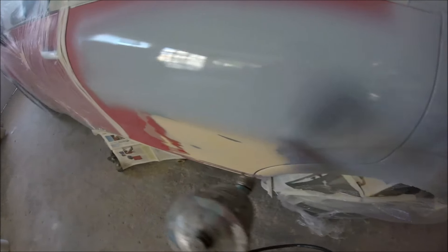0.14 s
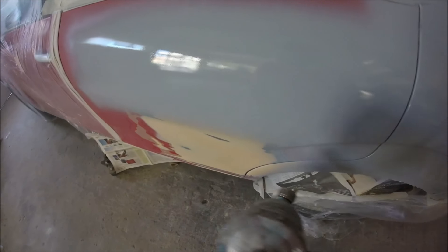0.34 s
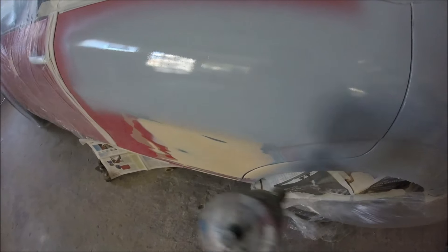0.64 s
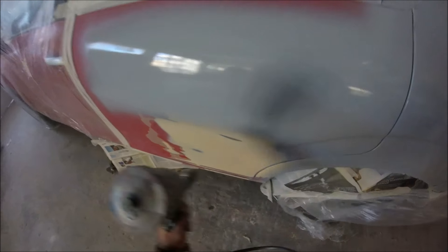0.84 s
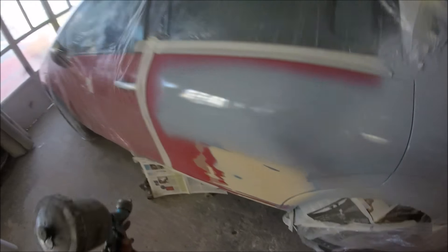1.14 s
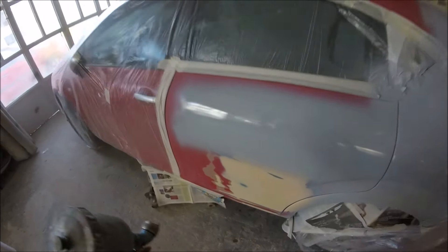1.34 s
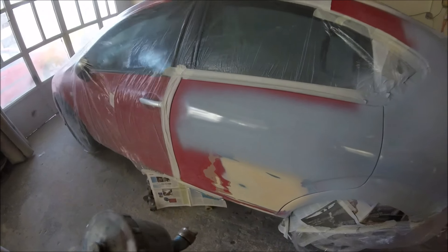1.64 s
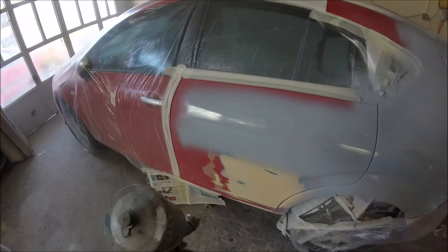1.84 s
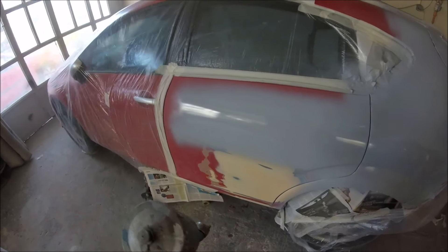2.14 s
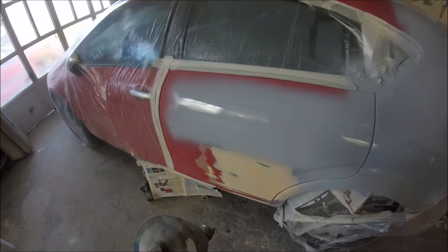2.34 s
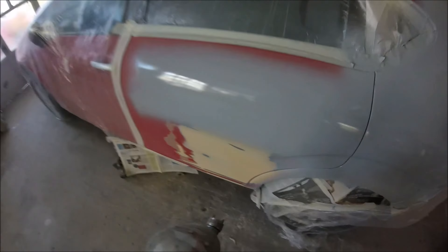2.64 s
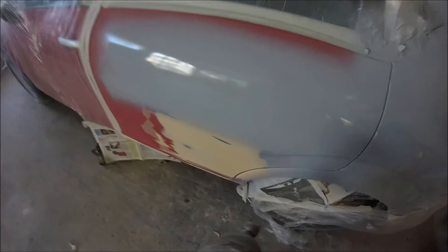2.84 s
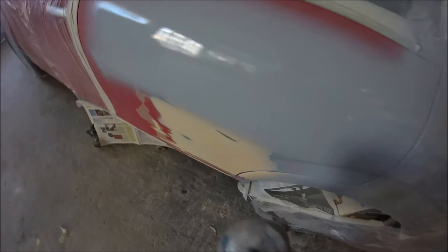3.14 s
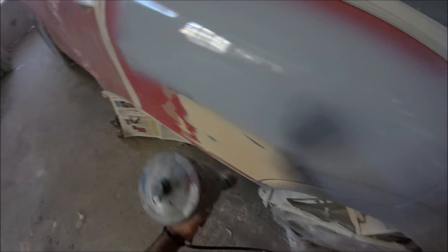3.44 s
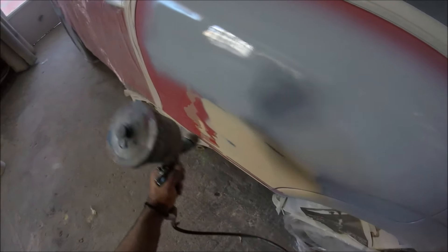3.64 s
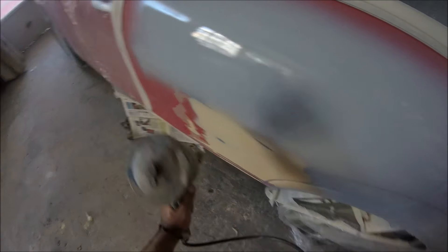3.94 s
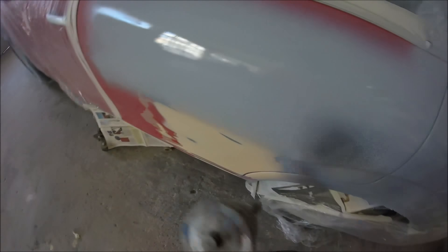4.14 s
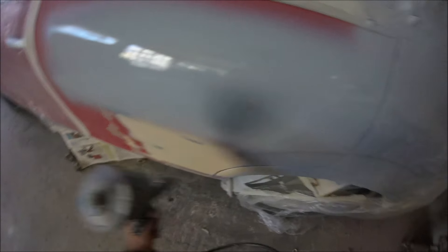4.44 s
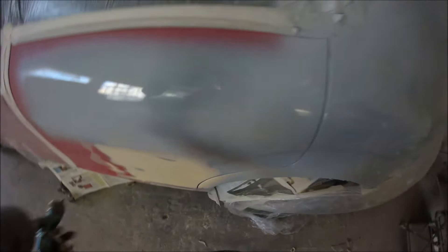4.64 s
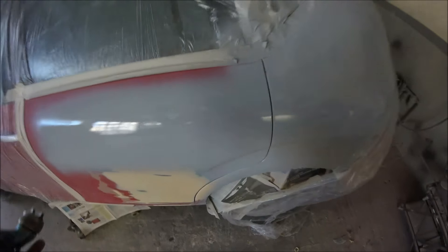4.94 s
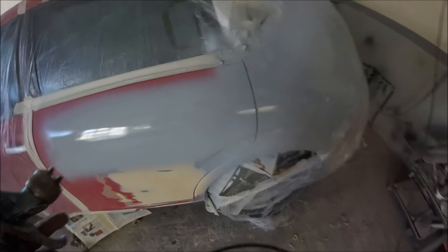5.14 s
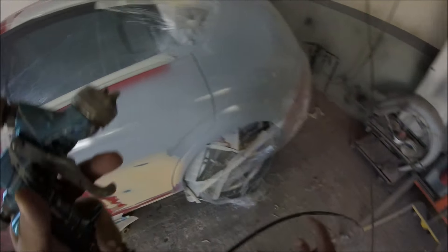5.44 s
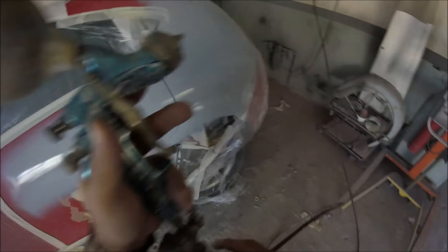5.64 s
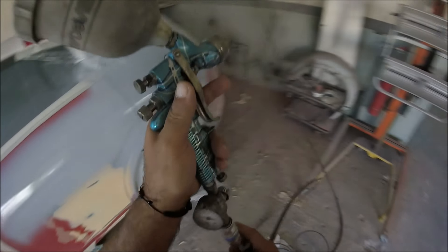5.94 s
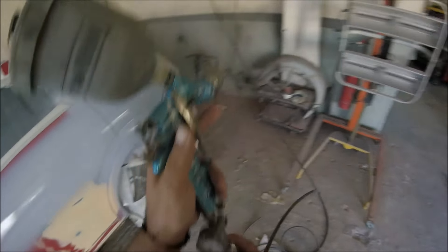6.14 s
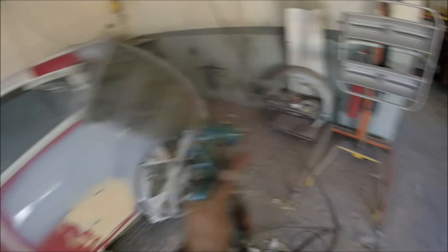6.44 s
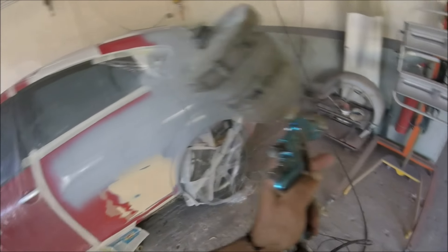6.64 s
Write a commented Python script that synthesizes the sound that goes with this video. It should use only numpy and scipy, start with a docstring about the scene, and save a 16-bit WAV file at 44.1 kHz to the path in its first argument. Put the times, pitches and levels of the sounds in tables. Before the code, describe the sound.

A compressed-air spray gun hisses from start to finish, painting a car panel in a workshop close to the microphone. The hiss is bright and steady, its tone shifting slightly as the gun moves. It stutters very briefly at about 0.3 and 0.4 seconds, then runs evenly until two more tiny stutters at around 5 seconds. At about 5.2 seconds there is one soft, deep thump as the gun swings up towards the microphone. The hiss grows louder and sharper, with a slightly hollow, sweeping colour, peaking near 5.6 seconds. It eases back by 6 seconds and is still going at the end, just short of 7 seconds. Behind it, machines give a faint, dull rumble and a low, wavering hum. Soft puffs of air buffet the microphone now and then, mainly in the first second and at around 3 and 5 seconds.

```python
"""A steady hiss with four tiny stutters: a compressed-air spray gun painting a car panel in a workshop.
The jet is turbulent noise with fixed resonances. Its narrow beams sweep past, and short reflections
off panel, hand and paint cup comb it as the gun moves. Near the end the gun swings close to the
microphone, with one low thump. Air buffets the microphone softly; machines rumble and hum behind."""
import sys
import numpy as np
from scipy.fft import rfft, irfft, next_fast_len
from scipy.io import wavfile
from scipy.ndimage import map_coordinates

SR = 44100
rng = np.random.default_rng(int(sys.argv[2]) if len(sys.argv) > 2 else 0)


def master_out(mix):
    """Clip the mix to full scale and print it as 16-bit PCM to the path in sys.argv[1]."""
    frames = np.transpose(np.atleast_2d(mix))
    ceiling = np.clip(frames, -1, 1)
    pcm = np.round(ceiling * 32767).astype(np.int16)
    wavfile.write(sys.argv[1], SR, pcm)


N = 298998
TIME = np.arange(N) / SR
HZ = np.maximum(np.fft.rfftfreq(next_fast_len(N), 1 / SR), 1)

# peaks in the hiss: (centre [Hz], width [Hz], gain [dB])
HISS_PEAKS = [(1115, 152, 12), (1326, 170, 10), (1670, 323, 8), (2408, 574, 8), (2827, 216, 7.5),
              (3360, 363, 10), (3760, 437, 10.5), (4265, 290, 8), (4593, 210, 5.5), (5830, 250, 1.5),
              (6430, 500, 6.5), (7640, 470, 4.5), (8320, 570, 4.5), (9290, 1000, 3.5), (10680, 430, 5.5),
              (11580, 320, 6), (12110, 360, 4.5), (14300, 740, 4.5)]
# gun lifted from panel towards microphone: (time [s], lift [0-1])
GUN_LIFT = [(4.4, 0.02), (4.8, 0.35), (5.3, 0.73), (5.75, 0.7), (6.2, 0.55), (6.5, 0.7), (6.78, 0.6)]


def spray(sputter_db, sputter_hz, flutter_db, flutter_hz):
    """The jet beams its treble, so each register follows rush, nearness and aim by its own shares."""
    # level curves, used about their means: (time [s], level [dB])
    rush = [(0, -51.9), (0.55, -54), (0.72, -46.5), (1.1, -51), (1.2, -59), (3.13, -59.5), (3.22, -47),
            (3.8, -56.5), (4.65, -50.5), (4.78, -60), (5.0, -59.5), (5.12, -52), (5.68, -54), (5.95, -56),
            (6.78, -55.5)]   # air spreading over the panel
    nearness = [(0, -43), (0.35, -42), (1.15, -43.5), (2.5, -45), (3.55, -42), (4.0, -43.5), (4.65, -42),
                (4.85, -38), (5.2, -34.5), (5.38, -33.5), (5.62, -31), (5.9, -38.5), (6.35, -40.5),
                (6.78, -43)]   # gun to microphone
    aim = [(0, -36), (0.28, -34.5), (0.68, -40), (0.86, -35.5), (1.08, -45), (1.48, -41.5), (1.66, -43.5),
           (2.55, -43), (2.92, -39), (3.22, -40.5), (3.68, -37), (3.8, -42.5), (4.02, -44), (4.17, -36.5),
           (4.33, -43), (4.48, -35.5), (4.65, -47), (4.85, -40.5), (5.0, -41), (5.2, -36.5), (5.42, -38),
           (5.62, -29.5), (5.7, -28.5), (5.88, -37.5), (6.78, -41)]   # treble beamed as the wrist turns
    top_hiss = [(0.0, -45), (0.02, -48.5), (0.98, -50), (1.05, -58), (1.45, -52), (1.74, -56.5),
                (2.83, -57), (2.96, -47), (3.19, -55), (3.51, -49), (4.02, -55), (4.14, -51), (4.57, -53),
                (4.65, -58), (4.85, -50), (5.12, -52), (5.7, -44), (5.97, -55), (6.4, -48), (6.53, -53),
                (6.67, -51), (6.78, -53)]   # above 12 kHz
    # rush, body, edge, hiss, sizzle, top:
    # (mean level [dB], shares [ratio] of rush, nearness, aim, top hiss, stutter depth)
    registers = [(-56.5, 0.9, 0.21, 0, 0, 1.2), (-42, 0.091, 0.21, 0.3, 0.044, 1),
                 (-42.5, 0, 0.96, 0.068, 0.078, 0.95), (-41, 0, 0, 0.99, 0.021, 0.56),
                 (-48.5, 0, 0.56, 0.46, 0.091, 1.1), (-48.5, 0, 0, 0, 1, 1.2)]
    # register boundaries: (frequency [Hz])
    crossovers_hz = [1500, 4000, 7400, 10000, 12400]
    breakup_db = sputter_db * drift(sputter_hz)   # uneven paint break-up shakes the whole jet
    jet = reflections(beams(nozzle()))
    moves_db = np.array(in_time(rush) + in_time(nearness) + in_time(aim) + in_time(top_hiss))
    moves_db -= moves_db.mean(axis=1, keepdims=True)
    bands = np.diff([low_pass(hz, order=24) for hz in crossovers_hz], axis=0, prepend=0, append=1)
    heights = np.linspace(0, 1, len(bands))
    steady, broken = np.zeros((2, N))
    for band, height, (mean_db, *shares, stutter_share) in zip(bands, heights, registers):
        level_db = mean_db + np.dot(shares, moves_db) + breakup_db + flutter_db * drift(flutter_hz)
        register = from_db(level_db) * rms_one(filtered(jet, band))
        steady += register
        broken += register * stutter(stutter_share, height)
    return broken + thin_tones(steady, width_hz=52, gain_db=8.0, top_hz=9800)


def nozzle():
    """Turbulent noise in the gun's resonances; close up, its ring stands out and the hollows deepen."""
    # broad jet spectrum: (frequency [Hz], relative level [dB])
    jet_spectrum = [(300, -31), (900, -17), (1020, -18.5), (1100, -10.5), (2000, -10.5), (3000, -9),
                    (5000, -14.5), (7000, -6.5), (9500, -2.5), (9950, -10), (13000, -9), (15000, -7)]
    # colour at full lift: (centre [Hz], width [Hz], gain [dB])
    close_ring = [(1670, 120, 0), (1980, 350, -3), (2760, 200, 4.5), (3800, 200, 5), (4850, 180, -0.5),
                  (5700, 220, -2), (11230, 350, -4), (11800, 320, 2.5), (14300, 800, 0)]
    lift, = in_time(GUN_LIFT)
    far = noise(from_db(over_hz(jet_spectrum) + bells(HISS_PEAKS)))
    close = filtered(far, from_db(bells(close_ring)))
    return far + lift * (close - far)


def beams(jet):
    """As the wrist turns, each passing beam (+) or gap (-) briefly lifts or hollows one band."""
    # passes over the microphone: (time [s], half width [s], centre [Hz], width [Hz], gain [dB])
    passes = [(.03, .17, 7300, 250, -8), (.15, 0.13, 10400, 1200, -7), (.42, 0.12, 3450, 280, 4.5),
              (.8, .2, 3400, 400, -1), (.47, .13, 4940, 400, -6), (.54, 0.18, 8260, 400, -8),
              (1.25, .22, 4350, 700, 4.5), (2.73, 0.29, 5540, 1200, 2), (3.13, 0.26, 8300, 700, -5),
              (4.33, 0.17, 3400, 400, 2), (4.74, 0.14, 10460, 1200, 5.5), (4.86, .09, 12900, 900, 6),
              (5.28, .1, 6000, 300, 4), (5.47, 0.12, 11400, 300, -5), (5.95, .3, 7150, 250, 3.5),
              (6.1, .16, 10550, 350, -5), (6.25, 0.43, 2770, 150, 2), (6.7, .13, 8320, 300, -8),
              (5.33, .12, 10900, 350, 5), (5.46, 0.18, 5500, 900, -2.5), (5.58, .1, 10100, 450, 6.5),
              (5.63, .11, 7600, 700, -5), (5.78, 0.063, 8300, 500, 2.5), (6.08, 0.26, 8880, 330, -7),
              (6.38, .11, 7760, 500, 4.5), (5.58, .08, 12200, 400, 4), (5.62, .09, 9130, 400, 3),
              (6.22, .13, 9350, 350, 3), (6.33, .1, 10800, 400, 6), (6.36, .07, 8550, 550, -5),
              (6.02, .14, 8400, 300, 2.5), (5.88, .06, 6060, 300, 4)]
    return jet + sum(swell(at_s, half_s) * filtered(jet, from_db(bells([band])) - 1)
                     for at_s, half_s, *band in passes)


def reflections(jet, sway_ms=0.13, sway_hz=0.23):
    """Near surfaces comb the jet in passing; far ones add a fine sliding ripple."""
    # panel, hand, cup in line with the jet: (time [s], half width [s], delay [ms], signed gain [ratio])
    glints = [(.39, 0.28, 0.53, -.12), (.57, 0.15, 0.72, -0.15), (1.3, 0.13, 0.55, 0.086),
              (1.62, .4, 0.56, -0.089), (3.87, 0.2, 0.36, 0.16), (4.98, 0.16, 0.696, 0.14),
              (4.98, 0.28, 0.237, 0.12), (5.19, 0.12, 0.73, -0.15), (5.38, 0.097, 0.47, 0.1),
              (5.58, 0.12, 0.81, .22), (5.73, 0.089, 0.27, -0.13), (5.88, 0.088, 0.73, 0.19),
              (5.91, 0.33, 0.95, 0.17), (6.42, .26, 0.832, -.1), (6.72, 0.17, 0.78, -0.2),
              (4.92, 0.091, .86, -.11), (5.03, .06, .355, -.12), (5.53, 0.11, 1.02, -0.12),
              (5.55, .12, 1.1, .13), (5.72, 0.076, .595, 0.037), (5.85, .15, 0.81, -0.1),
              (6.1, .15, .61, 0.06), (6.32, .07, 0.8, 0.12), (6.37, .08, 0.41, 0.089)]
    # far workshop surfaces: (delay [ms], gain [ratio])
    walls = [(4.7, 0.14), (8.3, 0.14), (13.1, 0.15)]
    shift_ms = sway_ms * drift(sway_hz)   # unsteady hand
    out = jet.copy()
    for at_s, half_s, delay_ms, gain in glints:
        echo = filtered(jet, np.exp(-2j * np.pi * HZ * delay_ms / 1000))
        out += gain * swell(at_s, half_s) * echo
    for k, (delay_ms, gain) in enumerate(walls):
        path_ms = delay_ms + shift_ms * (-1) ** k
        out += gain * map_coordinates(jet, [np.arange(N) - path_ms * SR / 1000], order=3)
    return out


def stutter(share, height=0, spread=1):
    """Gain with four brief dips; height blends their depth from mid (0) to top (1)."""
    # dips at share 1, spread 1: (time [s], half width [s], mid depth [dB], top depth [dB])
    dips = [(.271, .007, 14, 13), (.441, .0065, 18, 9), (4.943, .006, 19, 15), (5.029, .006, 19, 14)]
    depth_db = sum((mid_db + height * (top_db - mid_db)) * swell(at_s, spread * half_s)
                   for at_s, half_s, mid_db, top_db in dips)
    return from_db(-share * depth_db)


def thin_tones(jet, width_hz, gain_db, top_hz):
    """Thin tones sound during each brief dip in the hiss."""
    narrow = bells([(hz, width_hz, 1) for hz, _, _ in HISS_PEAKS]) * low_pass(top_hz, order=12)
    return from_db(gain_db) * filtered(jet, narrow) * (1 - stutter(1))


def thump(at_s, hz, level_db, attack_s, t60_s):
    """One soft, deep knock as the gun swings up: a damped sine."""
    age_s = np.maximum(TIME - at_s, 0)
    envelope = from_db(level_db - 60 * age_s / t60_s) * (1 - np.exp(-age_s / attack_s))
    return envelope * np.sin(2 * np.pi * hz * age_s)


def buffets(width_hz):
    """Air puffs on the microphone: short swells of deep noise."""
    # (time [s], half width [s], centre [Hz], rms at crest [dB])
    puffs = [(.28, .06, 68, -50), (.6, 0.054, 64, -47.5), (.92, .1, 24, -54), (1.33, .07, 22, -47),
             (2.5, .04, 28, -51), (2.77, 0.021, 42, -46), (3.2, .35, 55, -55.5), (4.3, .1, 61, -56),
             (4.95, 0.15, 60, -48.5), (5.29, .04, 24, -48)]
    return sum(from_db(db) * swell(at_s, half_s) * noise(bells([(hz, width_hz, 1)]))
               for at_s, half_s, hz, db in puffs)


def workshop(level_db, top_hz, steady_hz):
    """Dull rumble of machines and moving air; above steady_hz it dips with the hiss."""
    # (frequency [Hz], relative level [dB])
    shop_spectrum = [(10, 6), (30, 5.5), (68, -2), (82, -0.5), (110, -0.5), (142, -1.5), (165, -0.5),
                     (210, -6), (300, -8), (400, -10), (520, -12.5), (750, -14.5), (1000, -16)]
    air = from_db(level_db) * noise(from_db(over_hz(shop_spectrum)) * low_pass(top_hz, order=8))
    rumble = filtered(air, low_pass(steady_hz))
    return rumble + (air - rumble) * stutter(1.3, spread=1.5)


def motors(turn_db):
    """Motor and mains hum, wandering in pitch and level, fading as the painter turns away."""
    # (frequency [Hz], rms at zero lift [dB], wander [Hz], waver [dB])
    hum_lines = [(65.6, -59, 4.02, 3), (100.1, -59.5, 0.26, 1.5), (125, -65, 4, 5), (180, -69, 1.5, 4),
                 (242, -74, 1.34, 4)]
    lift, = in_time(GUN_LIFT)
    out = np.zeros(N)
    for hz, db, wander_hz, waver_db in hum_lines:
        phase = 2 * np.pi * np.cumsum(hz + wander_hz * drift(rate_hz=2.98)) / SR
        out += np.sqrt(2) * np.sin(phase) * from_db(db + waver_db * drift(rate_hz=3.5))
    return out * from_db(turn_db * lift)


def from_db(db):
    """Decibels to gain."""
    return 10 ** (np.asarray(db) / 20)


def rms_one(x):
    """Scale to unit rms."""
    return x / np.sqrt(np.mean(x ** 2) + 1e-20)


def in_time(rows):
    """List of a curve's value columns at every sample."""
    times_s, *columns = np.transpose(rows)
    return [np.interp(TIME, times_s, column) for column in columns]


def over_hz(points):
    """Spectrum points joined on a log-frequency axis."""
    hz, db = np.transpose(points)
    return np.interp(np.log(HZ), np.log(hz), db)


def bells(rows):
    return sum(peak * .5 ** ((2 * (HZ - hz) / width_hz) ** 2) for hz, width_hz, peak in rows)


def swell(at_s, half_s):
    """Gaussian in time, height 1."""
    return .5 ** np.minimum(((TIME - at_s) / half_s) ** 2, 60)


def low_pass(edge_hz, order=4):
    """Gain falling above an edge."""
    return 1 / (1 + (HZ / edge_hz) ** order)


def filtered(x, gain):
    """Apply a gain per frequency."""
    size = next_fast_len(N)
    return irfft(rfft(x, size) * gain, size)[..., :N]


def noise(gain):
    """Coloured noise, rms 1."""
    return rms_one(filtered(rng.standard_normal(N), gain))


def drift(rate_hz):
    """Slow random motion, rms 1."""
    return noise(low_pass(rate_hz, order=2))


def scene():
    """Spray gun over the workshop, same in both channels."""
    mono = spray(sputter_db=0.27, sputter_hz=25, flutter_db=0.3, flutter_hz=7.9)
    mono += workshop(level_db=-52, top_hz=1340, steady_hz=190)
    mono += motors(turn_db=-4)
    mono += buffets(width_hz=50)
    mono += thump(at_s=5.215, hz=66, level_db=-31.5, attack_s=.015, t60_s=.18)
    return np.array([mono, mono])


def record(dry):
    """Steep treble cut."""
    cutoff_hz, ramp_hz = 15370, 100
    return filtered(dry, np.clip((cutoff_hz - HZ) / ramp_hz, 0, 1))


dry = scene()
out = record(dry)
master_out(out)
```